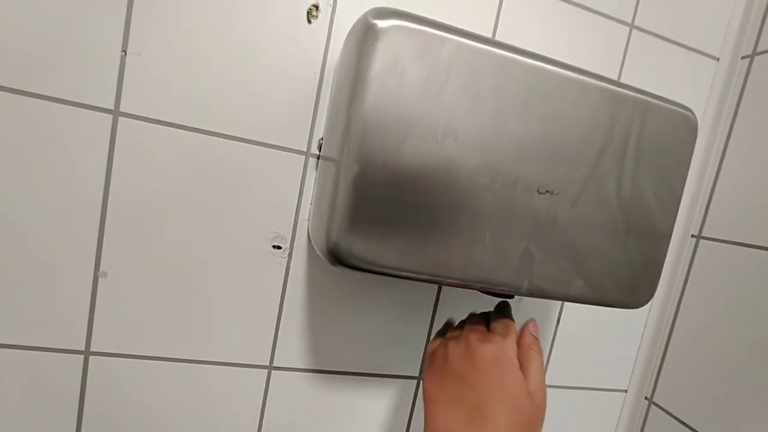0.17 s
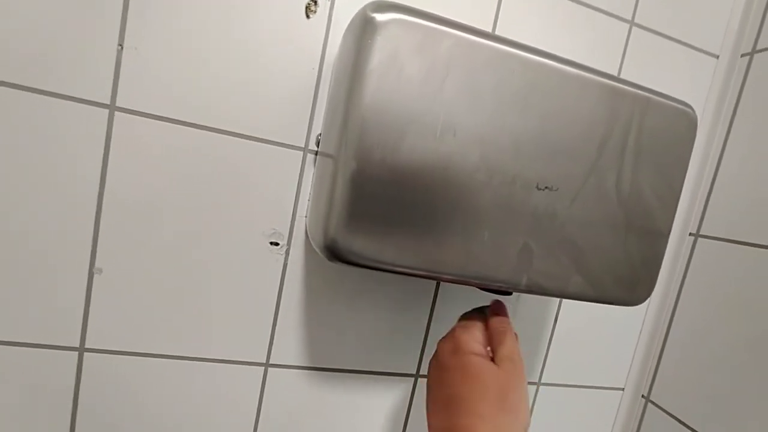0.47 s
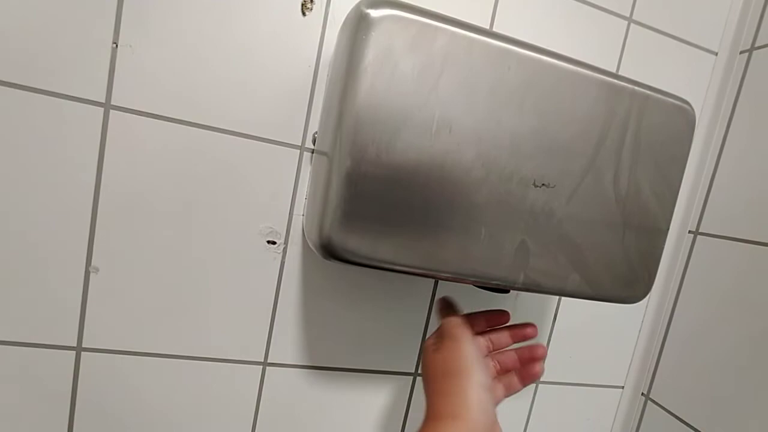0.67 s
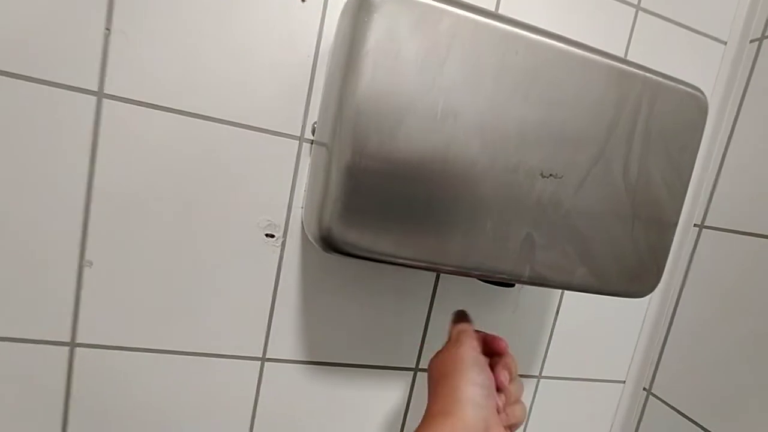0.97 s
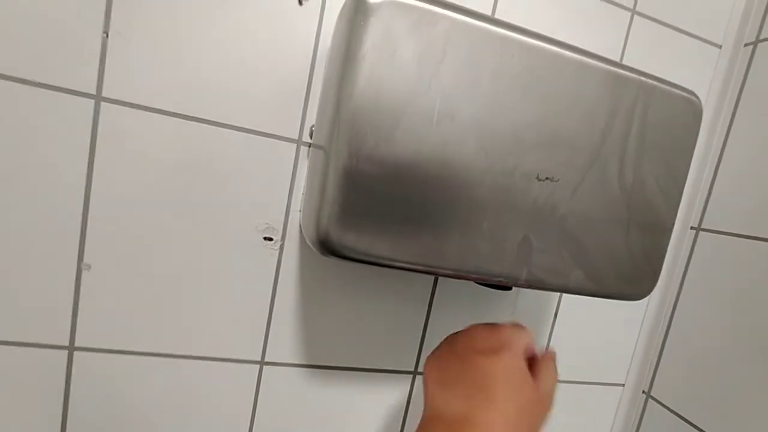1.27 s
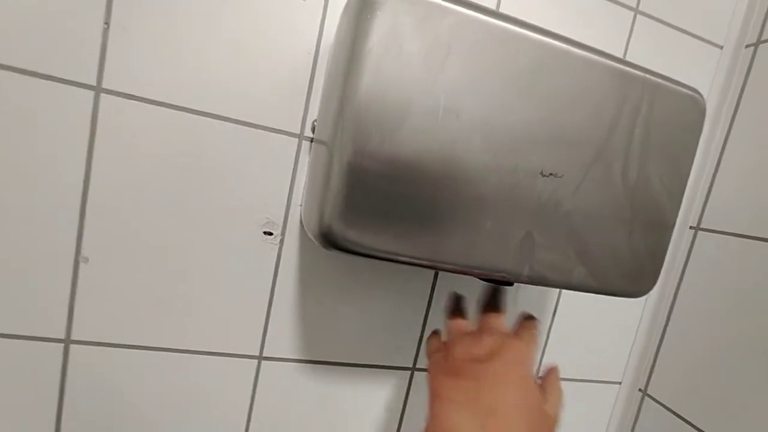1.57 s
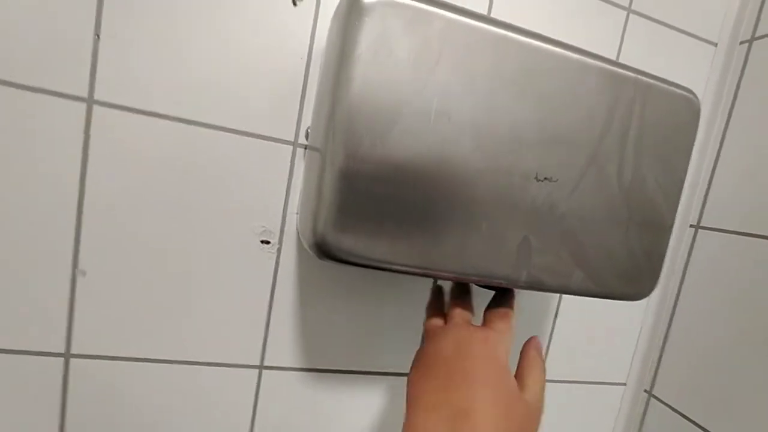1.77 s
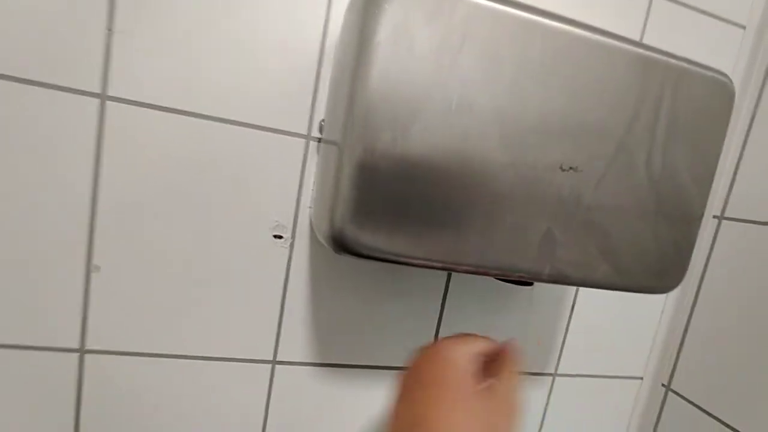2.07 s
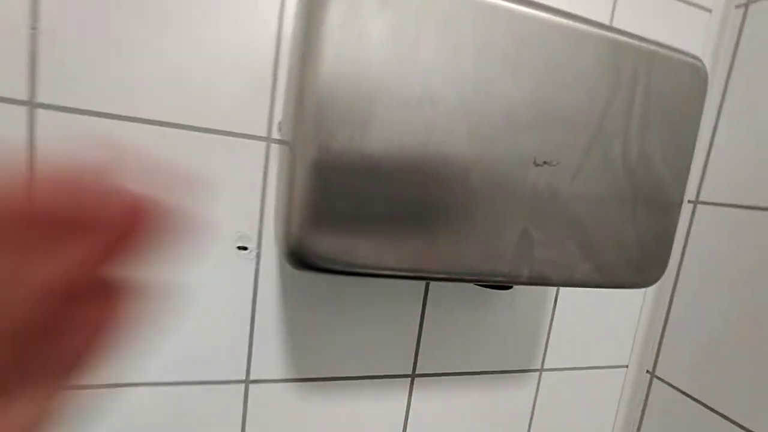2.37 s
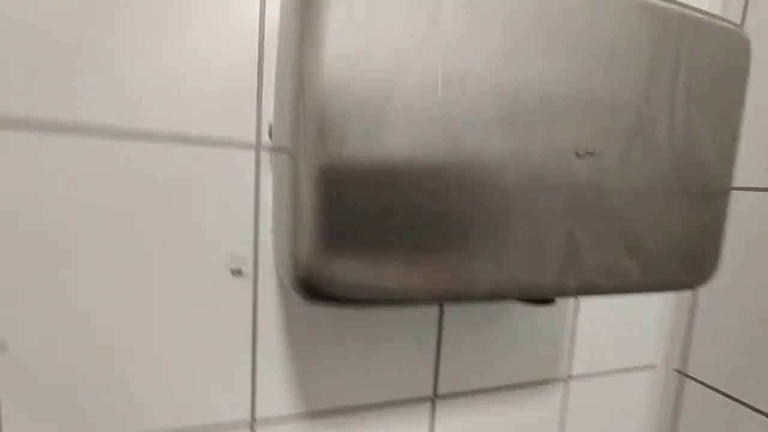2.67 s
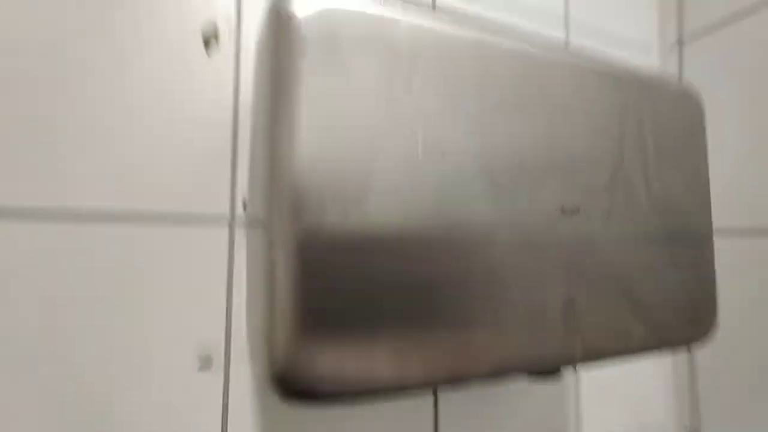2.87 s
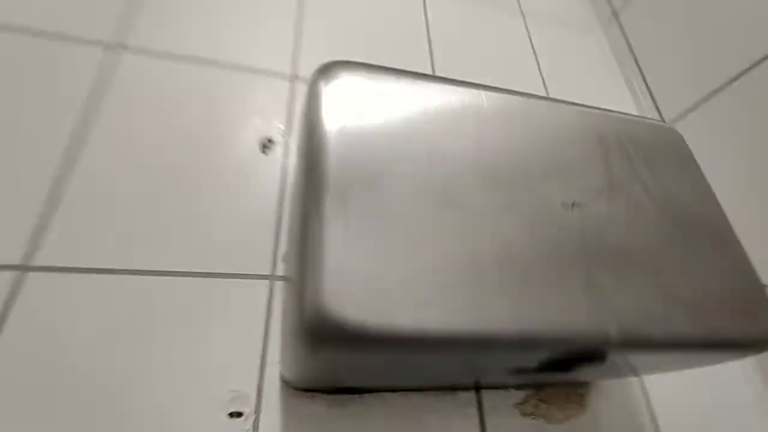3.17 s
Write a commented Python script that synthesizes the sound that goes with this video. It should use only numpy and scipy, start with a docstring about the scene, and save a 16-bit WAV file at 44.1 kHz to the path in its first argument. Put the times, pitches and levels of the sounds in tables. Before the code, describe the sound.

Loud hand dryer air blasts against a hand in a tiled restroom, then winds down, falling in pitch.

```python
"""An electric hand dryer blows on a hand in a tiled restroom, close to the microphone.
The jet is coloured noise with a fuzzy whistle; it roars and half whistles on the turning hand,
pressing a quick gain control down. The hand leaves and the motor cuts out: the blower's own rush,
filtered noise, comes up and the shaft's whine, a set of sines, falls.
A ringing steel panel, a low rumble and puffs of stray air fill in behind."""
import sys
import numpy as np
from scipy import signal
from scipy.fft import rfft, irfft
from scipy.io import wavfile
from scipy.ndimage import uniform_filter1d, minimum_filter1d

SR = 44100
rng = np.random.default_rng(int(sys.argv[2]) if len(sys.argv) > 2 else 0)


def generate_wav(sig):
    """Save sig (samples, or channels by samples) to the path in sys.argv[1] as 16-bit PCM at SR."""
    pcm = np.round(np.clip(np.atleast_2d(sig).T, -1, 1) * 32767).astype(np.int16)
    wavfile.write(sys.argv[1], SR, pcm)


N = 146412
T = np.arange(N) / SR  # seconds

# Spectrum tables give relative density; each noise is scaled to rms 1 before its level is set.
# the jet on the hand: (time [s], whistle centre [Hz], whistle level [dB], roar level [dB],
# cupped palm level [dB], hiss level [dB])
JET_ON_HAND = [(0, 2540, -13, -10, -36, -25.5), (0.162, 2550, -7.5, -7.5, -21, -19.5),
               (0.3, 2570, -10, -13.5, -32, -23.5), (0.46, 2540, -9, -11, -24.0, -23.5),
               (0.55, 2520, -5, -9, -35, -24.5), (0.641, 2550, -9.5, -8, -21, -18.5),
               (0.72, 2590, -12, -19, -21, -26), (0.818, 2550, -12.5, -15, -18, -22.5),
               (0.919, 2600, -14.5, -16, -27, -27.5), (0.99, 2706, -10, -15, -23, -24),
               (1.046, 2807, -10, -14, -19.5, -21.5), (1.08, 2750, -1, -18, -20.5, -28.0),
               (1.14, 2630, -8, -18, -26.5, -31.5), (1.167, 2640, -6, -10.0, -14, -16.5),
               (1.22, 2710, -2, -9.5, -23.5, -21), (1.3, 2650, -16.5, -13.5, -20.5, -31.5),
               (1.419, 2460, -17, -12, -24.5, -28), (1.58, 2290, -18, -10, -15, -23.5),
               (1.701, 2390, -10.0, -5.5, -19.5, -23.5), (1.8, 2450, -13.5, -12.5, -32, -25),
               (1.91, 2580, -11.5, -11.0, -26, -19), (2.02, 2500, -4, -10.5, -25, -19.5),
               (2.085, 2470, -4, -12.5, -24, -20), (2.13, 2540, -5, -6, -11.5, -15),
               (2.17, 2452, -3.5, -11, -16, -22), (2.215, 2205, -6, -9, -16, -24)]
# colour of the jet's roar: (frequency [Hz], density [dB per Hz])
ROAR_SPECTRUM = [(100, -33), (600, -29), (1200, -15), (1780, -10), (1960, 2), (2250, 2.5), (2600, -1),
                 (2870, 0), (3050, -11), (3270, -7), (3450, -21.5), (4300, -28), (6000, -41)]
# colour of the hollow rush in the cupped palm: (frequency [Hz], density [dB per Hz])
PALM_SPECTRUM = [(40, -32), (400, -20.5), (620, -15.5), (740, -5.5), (1000, -0.5), (1150, -1), (1400, 1),
                 (1700, -0.5), (2200, -2.5), (3500, -43)]
# colour of the jet's hiss, before its high-pass: (frequency [Hz], density [dB per Hz])
HISS_SPECTRUM = [(3600, 3.5), (4350, -11.5), (4700, -4), (4980, 1), (5450, -8.5), (6600, -10.5),
                 (7450, -3.5), (8400, -17), (9600, -11), (11200, -13), (12800, -12), (13600, -17),
                 (14300, -7), (15800, -19.5)]
# rush of the fan through the steel housing: (frequency [Hz], density [dB per Hz])
BLOWER_SPECTRUM = [(30, -23), (300, -19), (480, -16.5), (640, -15.5), (720, -8), (900, -12.5), (1120, -15),
                   (1340, -7), (1440, -4), (1580, -4), (1780, -1), (1950, -7), (2250, -1.5), (2530, 2.5),
                   (2850, -6), (3250, -7.5), (3550, -18), (4350, -22), (4700, -19.5), (4980, -13.5),
                   (5500, -21.5), (6500, -20.5), (7450, -17.5), (8500, -29.5), (10200, -26.5), (12500, -29),
                   (14000, -24), (15800, -30.5)]
# change of the rush each time the speed halves: (frequency [Hz], change [dB])
FADE_PER_HALVING = [(80, -1), (300, -8.5), (900, -6.5), (1600, -8), (2400, -12), (3200, -11.5), (4200, -15),
                    (5200, -9), (8000, -10), (15000, -5.5)]
# whine gliding through the room's standing waves: (time [s], level [dB])
WHINE_LEVEL = [(0, -38), (2.22, -36.5), (2.29, -28), (2.38, -41), (2.45, -39), (2.52, -49), (2.57, -31),
               (2.62, -44), (2.68, -32), (2.74, -30), (2.785, -39), (2.83, -30.5), (2.9, -28.5),
               (2.96, -38), (3.02, -36), (3.07, -33), (3.14, -29), (3.19, -40), (3.32, -35)]
# overtones of the shaft, before the housing colours them: (multiple of shaft speed [-], level [dB])
SHAFT_OVERTONES = [(2, -39), (3, -42), (4, -41.5), (5, -46), (6, -47.5), (7, -32), (9, -54), (11, -44),
                   (12, -39)]
# housing resonances that make the falling overtones flare: (frequency [Hz], gain [dB])
CASING_RESONANCES = [(440, -16), (530, 1), (620, -7), (715, 1), (790, 1.5), (880, 1.5), (960, -6),
                     (1040, 6), (1150, -17), (1300, 1), (1440, -1), (1600, -10), (1780, 2.5), (1950, -1),
                     (2550, 3), (3000, -1.5), (4000, -18), (5000, -1), (5500, -19)]
# ring of the steel panel: (frequency [Hz], density [dB per Hz])
PANEL_SPECTRUM = [(700, -38), (1330, -17), (1405, -12), (1436, 1.5), (1470, -12), (1550, -20), (3000, -43)]
# rumble of the unblocked jet on the tiles below: (frequency [Hz], density [dB per Hz])
RUMBLE_SPECTRUM = [(20, -18), (55, -19.5), (86, 6.5), (105, -6), (135, -2.5), (175, -1), (210, -8),
                   (300, -14.5), (420, -15), (900, -27.5)]
# stray air that buffets the microphone: (start [s], length [s], peak level [dB])
PUFF_TIMES = [(1.188, 0.083, -26), (2.045, 0.065, -33)]
# colour of the stray air: (frequency [Hz], density [dB per Hz])
PUFF_SPECTRUM = [(10, 1), (35, -7), (80, -17), (160, -11.5), (500, -56)]

# jet: when the hand is gone and how long it takes to leave; flutters in dB rms
HAND_GONE_S, LEAVE_S = 2.27, 0.084
FLUTTER_DB, HISS_FLUTTER_DB, HISS_FROM_HZ = 1.0, 1.24, 3800
WHISTLE_POLE_WIDTH_HZ = 370  # bandwidth of each of two equal poles
WHISTLE_WANDER = 0.01795  # rms share of the centre frequency
# shaft: full speed in turns per second; air drag slows it once the power is off
RUN_HZ, OFF_S, COAST_S, COAST_POWER = 451, 2.26, 1.47, 1.41
SHAFT_WAVER = 0.0016  # rms share of the speed
WHINE_WET, OVERTONE_WET = 0.085, 0.68  # echo's share of the power
# blower: the rush gusts as the hand sweeps out of the jet
BLOWER_DB, GUST_S, GUST_LENGTH_S, GUST_DB = -16.5, 2.29, 0.056, 8.5
# panel: strongest about when the fourth harmonic falls through it
PANEL_DB, PANEL_PEAK_S, PANEL_SWELL_S = -27, 2.57, 0.27
# free jet: when it comes free of the hand, its level at full speed, its change per halving of speed
FREE_S, FREE_RISE_S, RUMBLE_DB, RUMBLE_FADE_DB = 2.235, 0.034, -35, -4
ROOM_T60_S = 0.44
# gain control, then limiter (ceiling as amplitude), then band limit
THRESHOLD_DB, RATIO, SENSE_S, RECOVER_DB_PER_S = -19.5, 3.56, 0.015, 238
CEILING, CEILING_S, EDGE_HZ = 0.44, 0.0026, 15850


def amp(db):
    """Decibels to gain."""
    return 10 ** (np.asarray(db) / 20)


def unit(x):
    """Scales to rms 1."""
    return x / np.sqrt(np.mean(x ** 2) + 1e-20)


def read(points, hz):
    """Reads a spectrum table on a log-frequency axis."""
    f, value = np.transpose(points)
    return np.interp(np.log(hz + 1), np.log(f + 1), value)


def colour(x, points):
    """Filters by a spectrum table."""
    gain = amp(read(points, np.fft.rfftfreq(N, 1 / SR)))
    return irfft(rfft(x) * gain, N)


def noise(points):
    """Turbulence of a given colour, rms 1."""
    return unit(colour(rng.standard_normal(N), points))


def drift(rate_hz):
    """Slow random movement, low-passed near rate_hz, rms 1."""
    hz = np.fft.rfftfreq(N, 1 / SR)
    spectrum = rfft(rng.standard_normal(N))
    return unit(irfft(spectrum / (1 + (hz / rate_hz) ** 2), N))


def room(x, wet):
    """Mixes in the dense echo of the tiles, decaying noise; wet is its share of the power."""
    tail = rng.standard_normal(SR) * amp(-60 * T[:SR] / ROOM_T60_S)
    echo = signal.fftconvolve(x, tail / np.linalg.norm(tail))[:N]
    return np.sqrt(1 - wet) * x + np.sqrt(wet) * echo


def speed(t):
    """Shaft speed as a share of full speed, falling by a power law under air drag."""
    return (1 + np.maximum(t - OFF_S, 0) / COAST_S) ** -COAST_POWER


def whistle_on_fingers(centre_hz):
    """Eddies at the fingers: narrow complex noise shifted up to a wandering centre."""
    r = np.exp(-np.pi * WHISTLE_POLE_WIDTH_HZ / SR)
    white = rng.standard_normal(N) + 1j * rng.standard_normal(N)
    eddies = signal.lfilter([1], np.poly([r, r]), white)
    turns = np.cumsum(centre_hz * (1 + WHISTLE_WANDER * drift(rate_hz=30.4))) / SR
    return unit((eddies * np.exp(2j * np.pi * turns)).real)


def jet_on_hand():
    """A whistle at the fingers, a roar, the hollow rush of the palm and a hiss, fluttering together."""
    times, *columns = np.transpose(JET_ON_HAND)
    centre_hz, whistle_db, roar_db, palm_db, hiss_db = (np.interp(T, times, c) for c in columns)
    high_pass = signal.butter(4, HISS_FROM_HZ, "high", fs=SR, output="sos")
    hiss = unit(signal.sosfilt(high_pass, noise(HISS_SPECTRUM)))
    hiss_db = hiss_db + HISS_FLUTTER_DB * drift(rate_hz=13)
    air = whistle_on_fingers(centre_hz) * amp(whistle_db)
    air = air + noise(ROAR_SPECTRUM) * amp(roar_db)
    air = air + noise(PALM_SPECTRUM) * amp(palm_db)
    air = air + hiss * amp(hiss_db)
    flutter = amp(FLUTTER_DB * drift(rate_hz=30.6))
    blocked = np.clip((HAND_GONE_S - T) / LEAVE_S, 0, 1)  # share of the jet still on the hand
    return room(air * flutter * blocked, wet=0.15)


def blower():
    """The fan's rush keeps the housing's resonances and fades as the fan slows."""
    hz, t, bins = signal.stft(noise(BLOWER_SPECTRUM), SR, nperseg=1024)
    bins = bins * amp(-read(FADE_PER_HALVING, hz)[:, None] * np.log2(speed(t)))
    rush = signal.istft(bins, SR)[1][:N]
    gust_db = GUST_DB * np.exp(-((T - GUST_S) / GUST_LENGTH_S) ** 2)
    return room(rush, wet=0.11) * amp(BLOWER_DB + gust_db + 0.5 * drift(rate_hz=18))


def motor():
    """The shaft's whine and its overtones, which ring in the housing and the room."""
    shaft_hz = RUN_HZ * speed(T) * (1 + SHAFT_WAVER * drift(rate_hz=11.7))
    angle = 2 * np.pi * np.cumsum(shaft_hz) / SR
    whine = np.sin(angle) * amp(np.interp(T, *np.transpose(WHINE_LEVEL)))
    overtones = np.zeros(N)
    for multiple, db in SHAFT_OVERTONES:
        phase = 2 * np.pi * rng.random()
        overtones += amp(db) * np.sin(round(multiple) * angle + phase)
    overtones = colour(overtones, CASING_RESONANCES)
    # the root of two makes the table levels rms levels
    return np.sqrt(2) * (room(whine, WHINE_WET) + room(overtones, OVERTONE_WET))


def panel():
    """A steel panel that the rush keeps ringing: narrow noise that swells and sinks in the run-down."""
    swell = 1 / (1 + ((T - PANEL_PEAK_S) / PANEL_SWELL_S) ** 2)
    return noise(PANEL_SPECTRUM) * amp(PANEL_DB) * swell


def free_jet():
    """A low rumble on the tiles once the air can pass the hand, fading as the fan slows."""
    opening = np.clip((T - FREE_S) / FREE_RISE_S, 0, 1)
    return noise(RUMBLE_SPECTRUM) * opening * amp(RUMBLE_DB - RUMBLE_FADE_DB * np.log2(speed(T)))


def puffs():
    """Air glancing off the hand brushes the microphone: low noise in half-sine swells."""
    swells = np.zeros(N)
    for start, length, db in PUFF_TIMES:
        swells += amp(db) * np.sin(np.pi * np.clip((T - start) / length, 0, 1))
    return noise(PUFF_SPECTRUM) * swells


def scene():
    """Everything at the microphone, in one channel."""
    return (jet_on_hand() + blower() + motor() + panel() + free_jet() + puffs())[None]


def record(dry):
    """Quick gain control holds the level down, a limiter catches the peaks; then the band limit."""
    power = uniform_filter1d(dry[0] ** 2, int(SENSE_S * SR))
    power_db = 10 * np.log10(abs(power) + 1e-12)
    # the sensed level jumps up with the sound and sinks at a steady rate
    fall = T * RECOVER_DB_PER_S
    sensed_db = np.maximum.accumulate(power_db + fall) - fall
    over_db = np.maximum(sensed_db - THRESHOLD_DB, 0)
    held = dry * amp(-(1 - 1 / RATIO) * uniform_filter1d(over_db, size=200))
    span = int(CEILING_S * SR)
    peak_gain = CEILING / np.maximum(abs(held[0]), CEILING)
    held = held * uniform_filter1d(minimum_filter1d(peak_gain, span), span)
    low_pass = signal.firwin(511, EDGE_HZ, window=("kaiser", 9), fs=SR)
    return signal.oaconvolve(held, low_pass[None], "same")


dry = scene()
out = record(dry)
generate_wav(out)
```